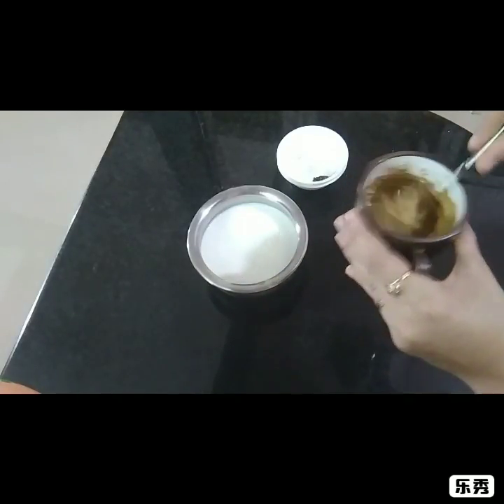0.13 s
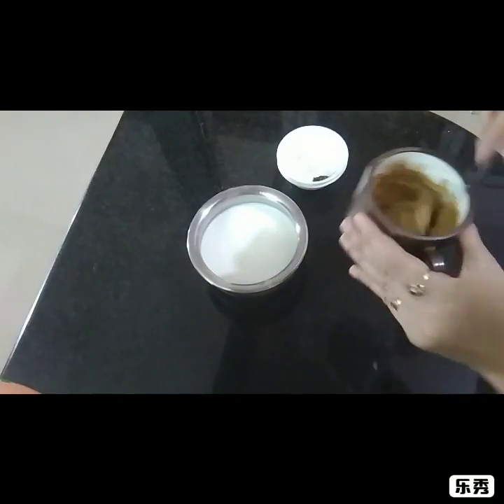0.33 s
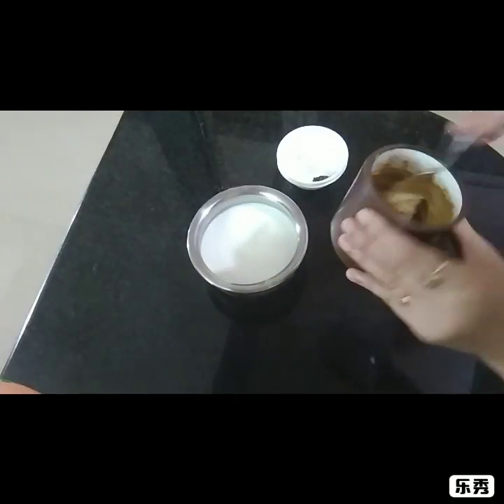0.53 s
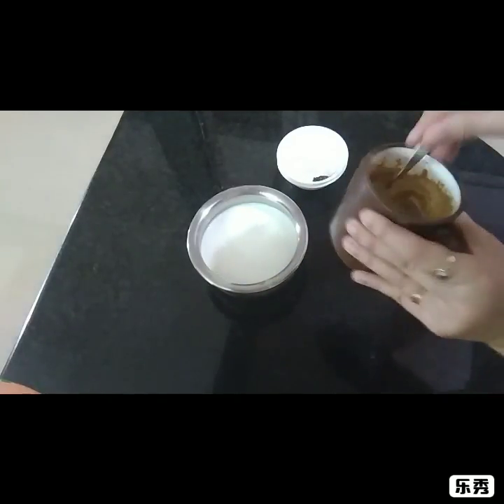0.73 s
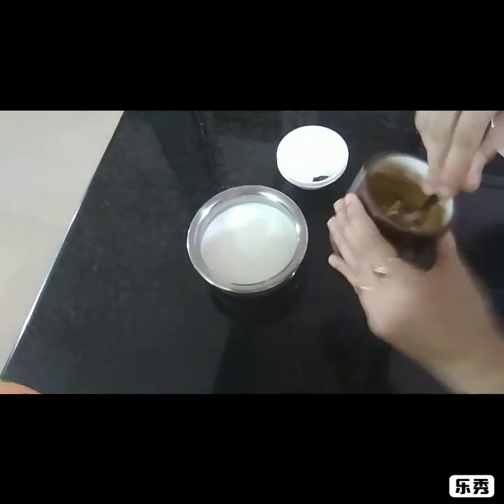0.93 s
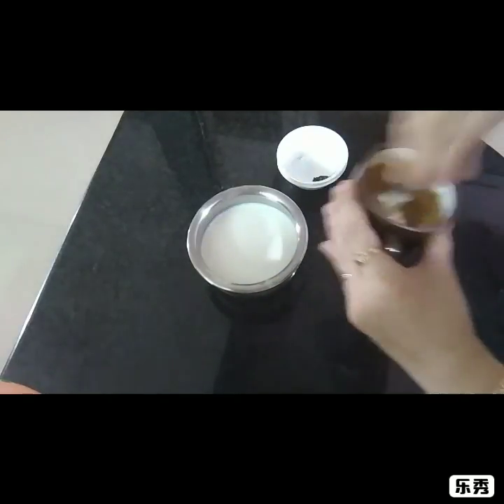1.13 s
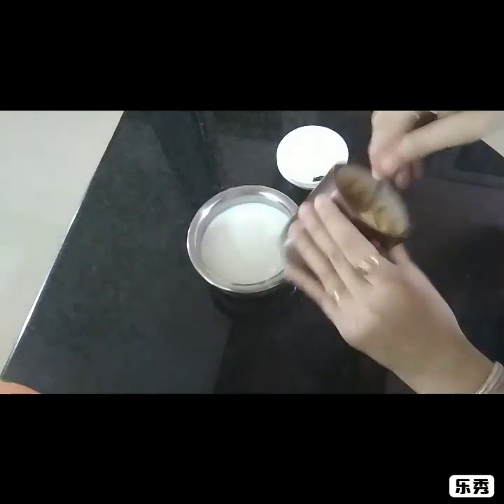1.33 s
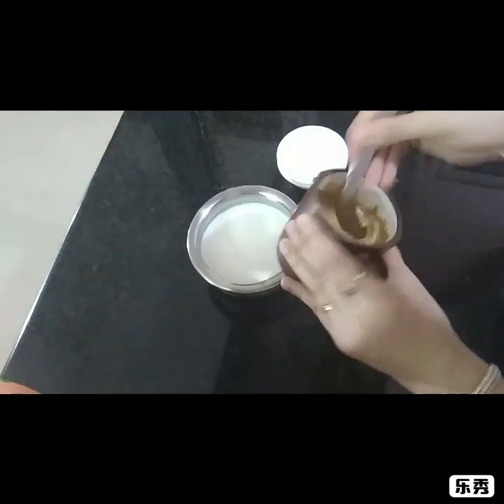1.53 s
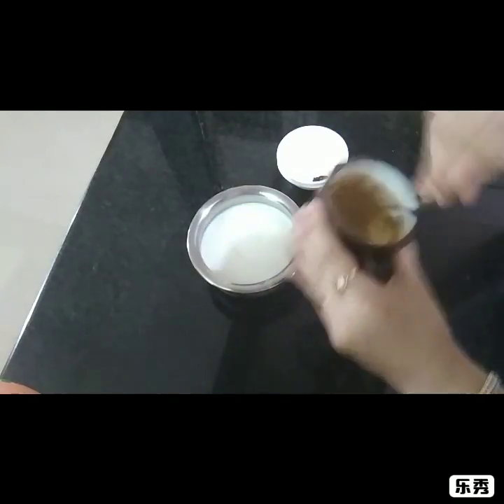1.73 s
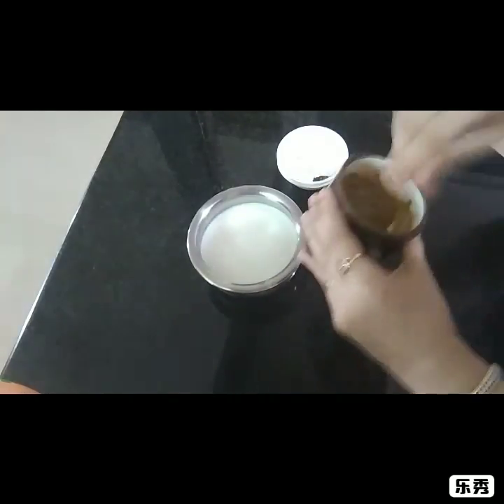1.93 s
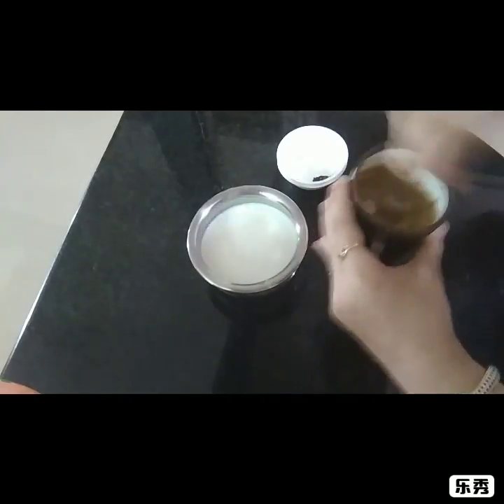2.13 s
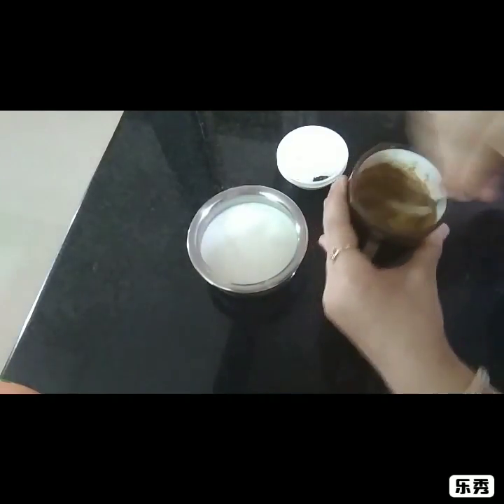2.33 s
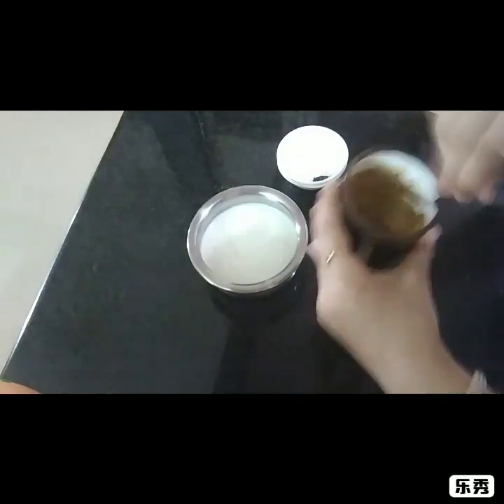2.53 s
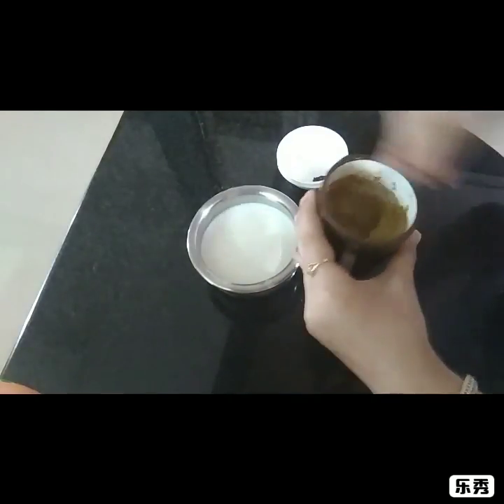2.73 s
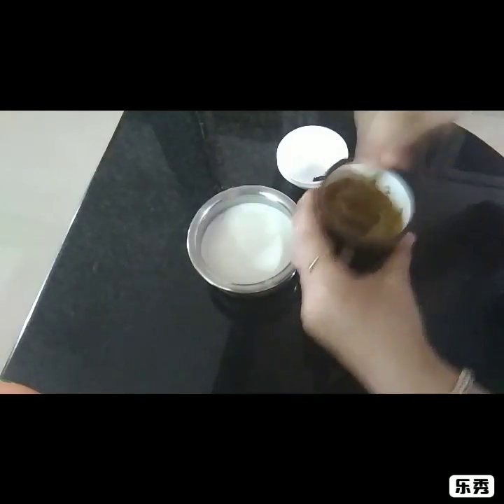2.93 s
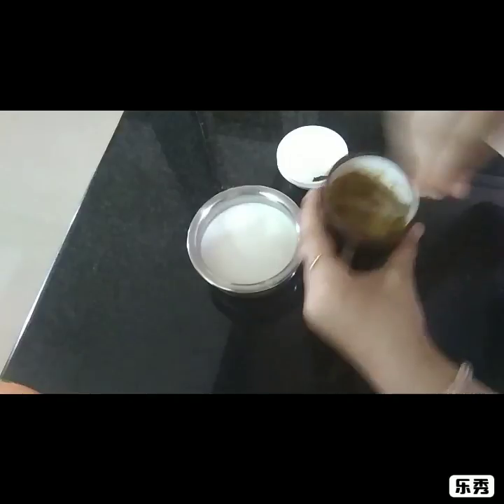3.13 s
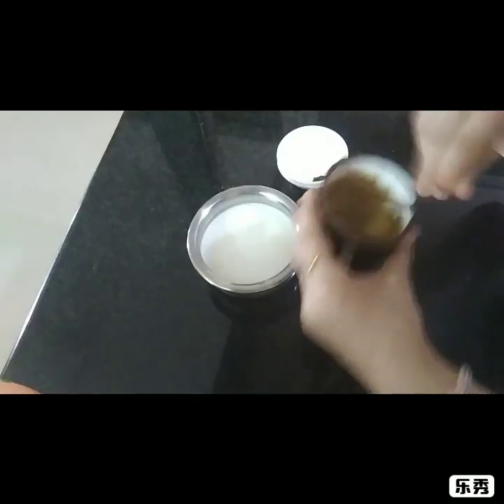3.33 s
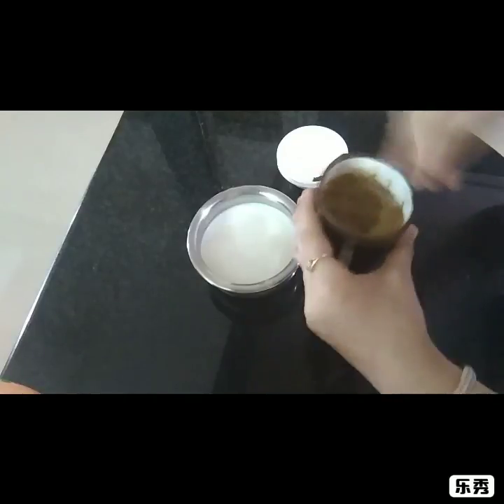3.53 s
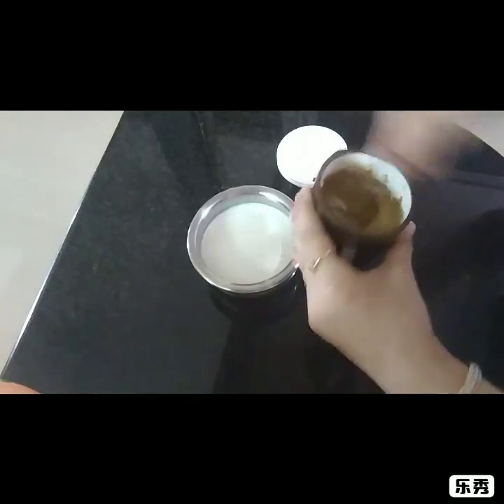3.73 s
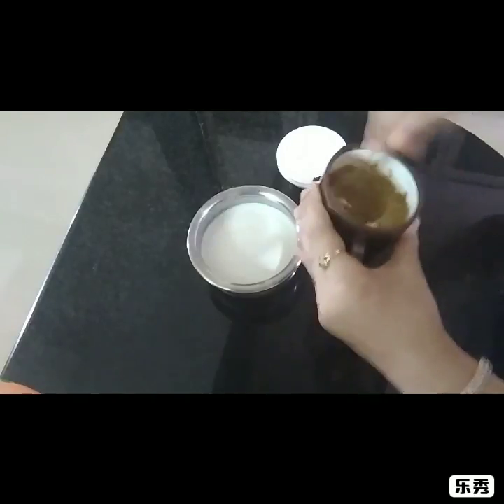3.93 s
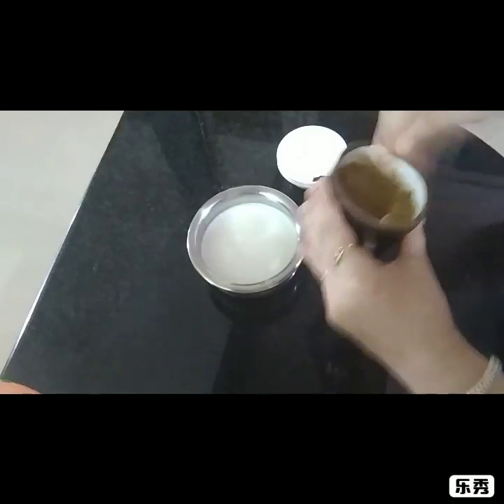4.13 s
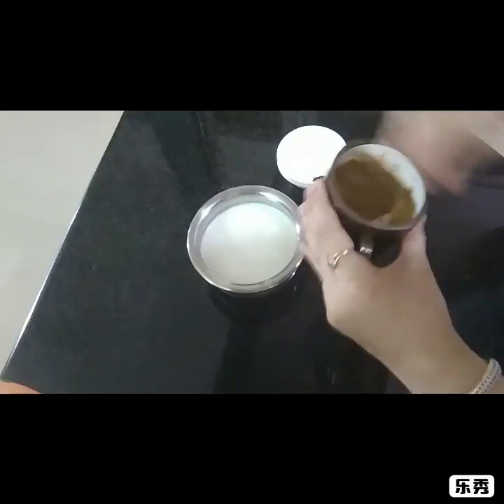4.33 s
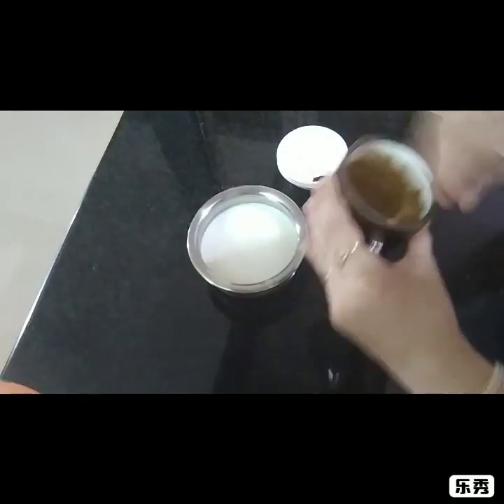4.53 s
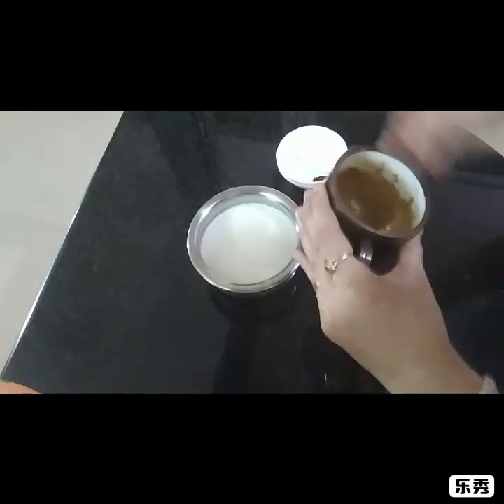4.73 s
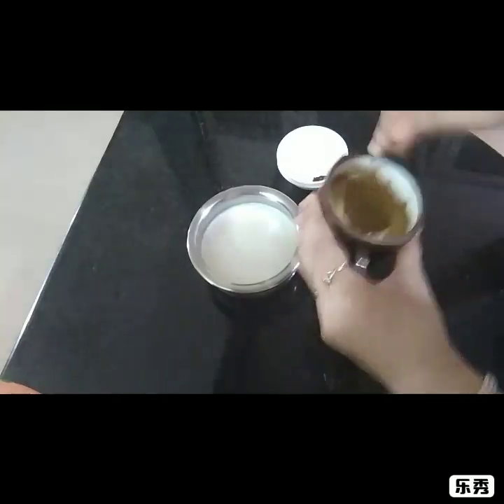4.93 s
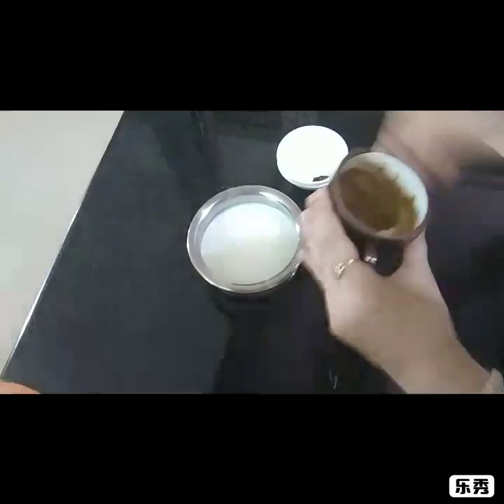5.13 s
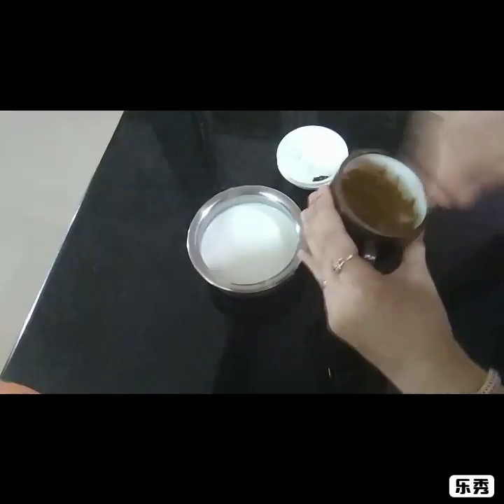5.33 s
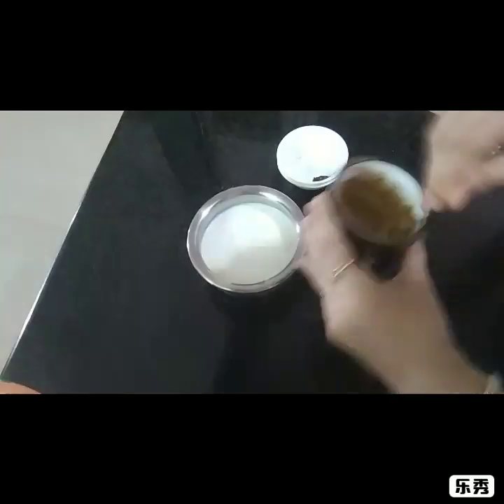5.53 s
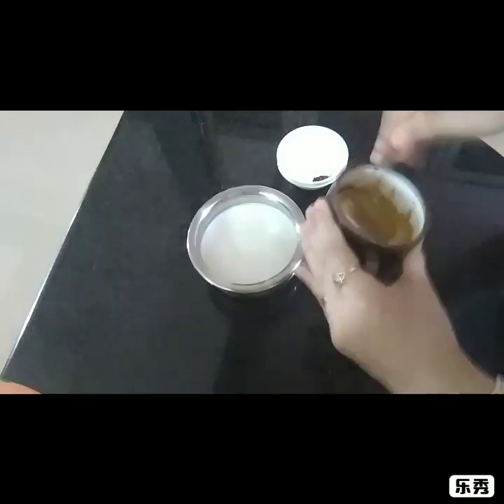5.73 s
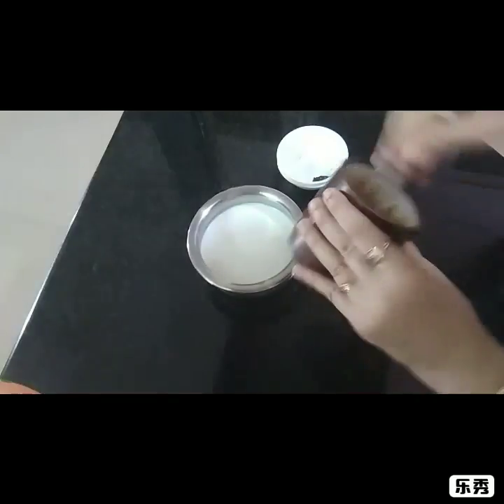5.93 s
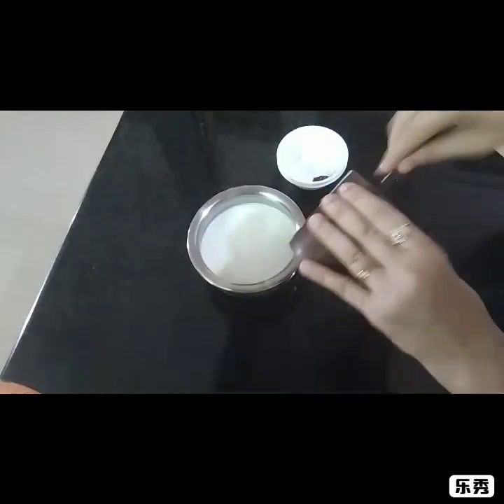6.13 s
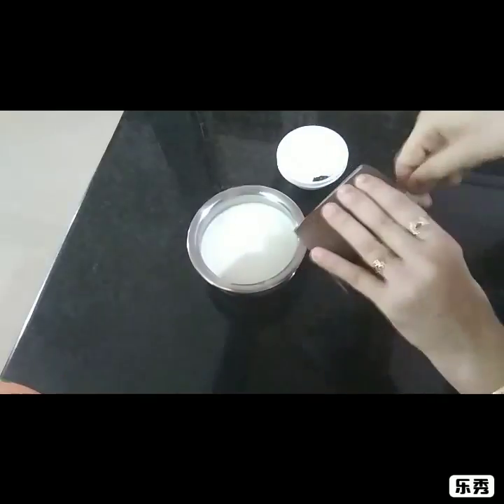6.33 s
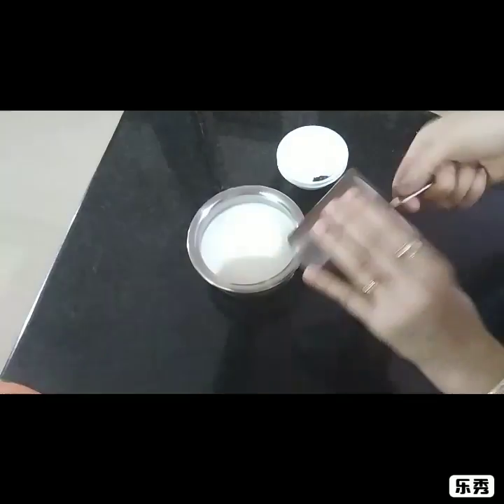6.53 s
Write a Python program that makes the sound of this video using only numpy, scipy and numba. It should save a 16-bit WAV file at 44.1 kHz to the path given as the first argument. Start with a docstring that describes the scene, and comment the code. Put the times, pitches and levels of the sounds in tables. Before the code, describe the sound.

A metal spoon whips thick sugary coffee paste in a hand-held mug, heard very near in stereo. After a soft, sparse start come bright cracks, dull short mug knocks, hollow air tones and continuous grainy rasp, roughly a dozen blows a second. One deep worktop thump interrupts early on. Tiled-room echo follows everything; finally the beating ceases and light scraping remains over a faint hush.

```python
"""Hard-walled kitchen: a steel spoon whips sugary coffee paste in a hand-held mug, then one heavy worktop thump.
Knocks: decaying sine modes of wall, air, rim and spoon plus a noise crack. Drag: grain noise through filters,
with wet slaps; the air in the mug hums along. Clunks and thuds: short narrow-band noise and sines.
An echo tail follows the mug; a faint hush lies below. Two close microphone ports."""
import sys
import numpy as np
from scipy import signal
from scipy.fft import rfft, irfft
from scipy.io import wavfile
from scipy.ndimage import uniform_filter1d
from numba import njit

SR = 44100
rng = np.random.default_rng(int(sys.argv[2]) if len(sys.argv) > 2 else 0)


def to_wav(s):
    """Save 16-bit WAV."""
    ch = np.atleast_2d(s).T  # columns
    pcm = np.round(np.clip(ch, -1, 1) * 32767)  # PCM
    wavfile.write(sys.argv[1], SR, pcm.astype(np.int16))


N = 291060

# air resonance as hand and paste cover the mug's mouth: (time [s], centre [Hz], width [Hz])
MOUTH = [(.54, 960, 50), (.62, 1086, 44.5), (.75, 1147, 44.5), (.86, 1138, 61), (.95, 1114, 110),
         (1.2, 1127, 110), (1.6, 1019, 200), (6.02, 1057, 110), (6.12, 776, 106.5), (6.35, 735, 109),
         (6.41, 770, 160), (6.48, 980, 230), (6.6, 850, 230)]
# spectrum of steel and grit on glaze, relative: (frequency [Hz], density [dB per Hz])
CRACK_SPECTRUM = [(1000, -63), (2500, -3), (7500, -4.5), (10500, 6.5), (13500, 4), (16500, -16)]
# mug wall modes: (frequency [Hz], t60 [s], relative level [dB])
WALL_MODES = [(399, 0.03, -16), (600, 0.024, -1), (778, 0.02, -1.5)]


def undb(db):
    """dB to gain."""
    return 10 ** (np.asarray(db) / 20)


def unit(x):
    """Scale to rms 1."""
    return x / np.sqrt(np.mean(x ** 2))


def along(table, hz):
    """Read a (Hz, value) table on a log-frequency axis."""
    f, v = np.transpose(table)
    return np.interp(np.log(hz + 1), np.log(f + 1), v)


def colour(x, table, share=1):
    """Filter by a (Hz, dB) table, its dB scaled by share."""
    n = x.shape[-1]
    gain = undb(share * along(table, np.fft.rfftfreq(n, 1 / SR)))
    return irfft(rfft(x) * gain, n)


def bandpass(x, low_hz, high_hz):
    """Butterworth band-pass."""
    return signal.sosfilt(signal.butter(2, [low_hz, high_hz], "band", fs=SR, output="sos"), x)


@njit
def svf(x, hz, width):
    """State-variable band-pass with a moving centre, gain 1 there."""
    y, b, l = np.empty(len(x)), 0., 0.
    for i in range(len(x)):
        g, k = np.tan(np.pi * hz[i] / SR), width[i] / hz[i]
        v = (b + g * (x[i] - l)) / (1 + g * (g + k))
        b, l, y[i] = 2 * v - b, l + 2 * g * v, k * v
    return y


def fade(t, t60):
    """Exponential decay, 60 dB in t60 (2 ms at least)."""
    return np.exp(-np.log(1000) * t / max(t60, .002))


def walk(hold):
    """Random levels held some samples and slewed; rms 1."""
    steps = np.repeat(rng.standard_normal(N // hold + 1), hold)[:N]
    return unit(uniform_filter1d(steps, size=hold))


def add(out, s, sound):
    """Mix a sound in at s seconds."""
    i = int(s * SR)
    out[..., i:i + sound.shape[-1]] += sound[..., :N - i]


def knocks():
    """Each blow builds up through the paste, rings scattered modes and cracks; rows: shared by the ports, unlike."""
    # spoon on mug: (time [s], crack, wall, air, rim level [dB])
    blows = [(0.278, -52, -52.5, -55, -67), (0.536, -52, -78, -61.5, -94), (0.836, -50, -58, -56, -78),
             (1.2149, -30, -30, -49, -80), (1.261, -22, -27.5, -51, -57), (1.2963, -11, -34, -57, -33.5),
             (1.435, -21.5, -69, -65, -58), (1.4567, -20, -44, -38.5, -65), (1.5934, -15.5, -37, -35, -40),
             (1.6473, -49, -24.5, -48, -61), (1.685, -52, -31.5, -59, -62), (1.781, -34, -30, -36, -39.5),
             (1.8558, -28, -32.5, -35.5, -49.5), (1.9355, -13, -25.5, -29.5, -39.5),
             (1.944, -28, -32.5, -32, -48), (2.003, -16, -28, -74, -34), (2.0623, -3, -24.5, -23.5, -37),
             (2.171, -22, -25.5, -30.5, -57), (2.4228, -14, -20.5, -24.5, -26),
             (2.4651, -8, -25.5, -24, -30.5), (2.5669, -10, -44, -27.5, -57), (2.573, -24, -40, -34.5, -42),
             (2.6175, -8.5, -19, -25.5, -20), (2.693, -20, -20, -34, -51), (2.6993, -14, -22, -26.5, -37),
             (2.742, -17.5, -29, -42, -44), (2.8565, -11, -32, -48, -31.5), (2.868, -16, -31, -49, -27),
             (2.9028, -20, -35, -31, -31), (2.9448, -30, -22.5, -19.5, -40), (2.9806, -9, -28, -47, -28),
             (3.104, -12, -31.5, -33.5, -34.5), (3.1649, -27, -35.5, -38, -30),
             (3.197, -14, -26.5, -43, -41), (3.229, -16.5, -24.5, -29, -40),
             (3.244, -14.5, -20.5, -17, -23.5), (3.324, -17.5, -26.5, -32.5, -35.5),
             (3.359, -12, -26, -26.5, -34), (3.3737, -5.5, -25.5, -30, -22.5),
             (3.454, -12.5, -22.5, -24, -27), (3.502, -12, -24, -27, -34.5), (3.5816, -37, -29, -33, -42),
             (3.6061, -11.5, -19, -20.5, -28.5), (3.708, -31, -36, -33.5, -60),
             (3.7441, -15.5, -27, -37, -41.5), (3.829, -15.5, -32, -37, -39),
             (3.8526, -20, -27, -24.5, -30.5), (3.9036, -19.5, -42, -24.5, -30.5),
             (3.9423, -17.5, -21.5, -23, -43), (3.9954, -26, -24, -33.5, -40),
             (4.0684, -12.5, -22.5, -35, -49), (4.1104, -11.5, -15, -20.5, -19.5),
             (4.2426, -22.5, -51, -40.5, -41), (4.326, -25, -28, -35.5, -36.5),
             (4.3948, -19, -36, -30.5, -40.5), (4.44, -7.5, -21.5, -14.5, -30),
             (4.5544, -7, -25.5, -23.5, -35), (4.606, -11.5, -26, -41, -33), (4.612, -19, -25, -32, -23.5),
             (4.665, -10, -15, -16.5, -29), (4.7475, -23, -31.5, -58, -55), (4.837, -29, -32, -30, -40.5),
             (4.8482, -27, -25, -41.5, -29.5), (4.939, -13.5, -21, -17.5, -38), (5.064, -45, -35, -36, -67),
             (5.115, -17, -19, -28, -19.5), (5.193, -15, -24, -33, -29.5), (5.2312, -12, -22.5, -26, -32),
             (5.29, -18, -32, -52, -40), (5.345, -14.5, -35, -35.5, -39), (5.449, -19, -26.5, -30.5, -37.5),
             (5.5124, -13.5, -23.5, -29.5, -27), (5.5711, -9, -31.5, -36.5, -36),
             (5.602, -9.5, -25, -28.5, -24.5), (5.699, -10.5, -25, -25.5, -33.5),
             (5.8448, -15.5, -38, -40, -51), (5.8805, -22, -31.5, -35, -29.5),
             (5.9805, -16, -45, -37, -40.5), (6.0827, -26, -71, -57, -55), (6.1404, -66, -73, -44.5, -77),
             (6.288, -53, -67, -45.5, -58), (6.3872, -23.5, -43, -46.5, -57)]
    # modes of the air in the mug, moved in proportion to MOUTH: (frequency [Hz], t60 [s], relative level [dB])
    air_modes = [(1062, 0.036, 3), (1323, 0.015, -1)]
    # rim modes: (frequency [Hz], t60 [s], relative level [dB])
    rim_modes = [(1720, 0.03, -19.5), (2628, 0.013, 0), (3270, 0.0026, -5)]
    # spoon mode: (frequency [Hz], t60 [s], relative level [dB])
    spoon_modes = [(5156, 0.03, -5)]
    crest_db = 11  # crack level over its noise rms
    rise_median_ms, rise_spread = 3.1, .35  # until the paste gives way; hard blows shorten it
    mode_spread_db, tilt_spread = 3.5, .25  # blow-to-blow scatter of modes and of crack colour
    tick_t60_s = .014
    bounce_count, bounce_scale_ms, bounce_db = 3, 8, -10

    out, t = np.zeros((2, N)), np.arange(4096) / SR
    groups = [WALL_MODES, air_modes, rim_modes, spoon_modes]
    hz, t60, db = np.transpose(sum(groups, []))[:, :, None]
    air = slice(len(WALL_MODES), len(WALL_MODES) + len(air_modes))
    for s, crack_peak_db, wall_db, air_db, rim_db in blows:
        crack_db = crack_peak_db - crest_db
        spoon_db = (crack_db + rim_db) / 2 - 6.5
        rise = rise_median_ms * np.exp(rise_spread * rng.standard_normal()) * 1e-3
        # a hard blow cuts through sooner
        rise *= np.clip(undb(-20 - max(wall_db, air_db)) / 2, .25, 1)
        build, after = np.minimum(t / rise, 1) ** 2, np.maximum(t - rise, 0)

        group_db = [wall_db, air_db, rim_db, spoon_db]
        blow_db = np.repeat(group_db, [len(g) for g in groups])[:, None]
        # the mouth sets the pitch of the air
        mouth_hz = np.interp(s, *np.transpose(MOUTH)[:2])
        hz[air] = np.array(air_modes)[:, :1] * mouth_hz / air_modes[0][0]
        # landing spot scatters mode levels, clinging paste detunes: (row, level / detune / phase, mode, 1)
        chance = rng.standard_normal((2, 3, len(hz), 1))
        chance[0, 1, air.stop:] *= .5  # rim and spoon stand clear of the paste
        chance[0, :2, air] *= 0.4  # the air is less in its reach
        tone = np.sin(2 * np.pi * hz * (1 + 0.045 * chance[0, 1]) * t + 1.54 * chance[:, 2])
        mode_gain = undb(blow_db + db + mode_spread_db * chance[:, 0])
        modes = mode_gain * np.exp(-np.log(1000) * after / t60) * tone

        noise = rng.standard_normal((4, 2, len(t)))
        tilt = 1 + tilt_spread * rng.standard_normal()
        crack = undb(crack_db) * unit(colour(noise[0], CRACK_SPECTRUM, tilt))
        crack += undb(rim_db - 2.5) * unit(bandpass(noise[1], 840, 3500))
        crack += undb(spoon_db) * unit(bandpass(noise[2], 4750, 6600))
        # sharp tick, then grit shaken loose; sliding steel chatters
        burst = fade(after, tick_t60_s) + undb(-9.0) * fade(after, 0.22)
        chatter = undb(1.64 * unit(uniform_filter1d(noise[3, 0], size=90)))
        # wet paste keeps touching the wall, so the ring wobbles
        smear = undb(3 * unit(uniform_filter1d(noise[3, 1], size=160)))
        blow = build ** .5 * smear * modes.sum(axis=1) + build * chatter * burst * crack
        add(out, s - rise / 2, blow)
        # the spoon touches again, weaker
        for wait, size in rng.exponential(size=(bounce_count, 2)):
            bounce_gain = undb(bounce_db - 4 * size - 4 * wait)
            add(out, s + (.2 + wait) * bounce_scale_ms / 1000, bounce_gain * blow)
    return out


def drag():
    """Sugar grains crunch under the spoon; the same rubbing drives the rim, the air in the mug and the wall."""
    # steady pressure of spoon on paste: (time [s], grit level [dB], air hum level [dB])
    pressure = [(0, -79.5, -76), (.3, -88, -94), (0.521, -77, -94), (0.549, -77, -71), (0.679, -58, -53),
                (0.781, -57, -45.5), (1.06, -51, -54.5), (1.19, -67, -59), (1.36, -46.5, -56),
                (1.6, -49, -43.5), (1.9, -56.5, -87), (2.2, -39.5, -64), (3.099, -48, -48),
                (4.6, -46, -52.5), (5.6, -48.5, -46.5), (5.93, -48, -73), (6.06, -53.5, -63),
                (6.13, -59, -77), (6.15, -59, -60), (6.25, -62, -67), (6.37, -61, -74), (6.45, -47, -52),
                (6.6, -55, -57.5)]
    # sweeps along the wall and lulls: (time of greatest change [s], grit relative to steady level,
    # negative for a lull [dB])
    sweeps = [(0.099, 19.5), (0.954, 11), (1.45, 2), (2.4, -0.5), (2.68, -8.5), (2.92, -1), (3.19, 8),
              (3.31, 5.5), (3.69, 5.5), (3.92, 8.5), (4.52, 7.5), (5.15, 10.5), (5.38, 12), (5.801, 6),
              (6.309, 12)]
    # unevenness of each part: [grit, rasp, hum, wall] [dB]
    slip_spread_db = (3, 2.5, 2, 4)
    sweep_in_s, sweep_out_s = 0.073, 0.12
    firm_db = -46  # grit level at firm pressure
    rasp_db, rasp_slope = -50, 1.68  # level at firm pressure; dB lost per dB below it
    wall_db, wall_slope = -57.5, 5.5
    hum_slope = 0.052  # dB per dB of sweep
    lump_share = 1.1
    wander = .045  # relative rms of the air pitch wander at firm pressure

    t = np.arange(N) / SR
    s, steady_db, hum_db = np.transpose(pressure)
    sweep_db = sum(db * np.interp(t - at, [-sweep_in_s, 0, sweep_out_s], [0, 1, 0]) for at, db in sweeps)
    grit_db = np.interp(t, s, steady_db) + sweep_db
    # a light touch only rolls the grains; rim and wall speak once the spoon bears down
    light, firm = np.minimum(grit_db - firm_db, 0), np.maximum(grit_db - firm_db, 0)
    rasp_level_db = rasp_db + rasp_slope * light + firm
    hum_level_db = np.interp(t, s, hum_db) + hum_slope * sweep_db
    wall_level_db = wall_db + wall_slope * light + firm

    grain_gain = undb(np.minimum(3 * rng.exponential(size=N), 20))
    grains = unit(rng.standard_normal((2, N)) * grain_gain)
    grit = colour(grains, CRACK_SPECTRUM)
    # the rasp is seven noise bands whose levels wander separately; the lowest need a firm push
    rasp = 0
    for hz in 1900 * 1.27 ** np.arange(7):
        band_gain = undb(5 * walk(1600)) * undb(light * (1900 / hz) ** 2)
        rasp = rasp + band_gain * bandpass(grains, hz / 1.13, hz * 1.13)
    # spoon and paste keep changing the air space
    at, centre_hz, width_hz = np.transpose(MOUTH)
    mouth, width = np.interp(t, at, centre_hz), np.interp(t, at, width_hz)
    mouth = mouth * (1 + wander * walk(2500) * undb(2 * light))
    hum = np.array([svf(svf(svf(g, mouth, width), mouth, 2 * width), mouth, 2 * width) for g in grains])
    wall = sum(undb(db) * bandpass(grains, hz - 70, hz + 70) for hz, _, db in WALL_MODES)

    out = slaps(rasp_level_db)
    levels_db = (grit_db, rasp_level_db, hum_level_db, wall_level_db)
    for part, db, slip_db in zip((grit, rasp, hum, wall), levels_db, slip_spread_db):
        slips = walk(300)  # uneven slipping, felt separately by each part
        lumps = walk(1500)  # thick and thin paste
        out = out + undb(db + slip_db * (slips + lump_share * lumps)) * unit(part)
    return out


def slaps(level_db):
    """Wet paste smacks the wall: decaying sines of random pitch, a few cycles each, following level_db."""
    slaps_per_s, slap_db = 90, 11  # slap_db over level_db, before random size
    out, t = np.zeros((2, N)), np.arange(768) / SR
    for at, pitch, size, turn in rng.random((int(slaps_per_s * N / SR), 4)):
        hz = 450 * 7 ** pitch
        tone = np.sin(2 * np.pi * (hz * t + np.array([[0], [turn]])))
        tone = tone * np.minimum(t * hz, 1) * fade(t, 9 / hz + .003)
        gain = undb(level_db[int(at * N)] + slap_db + 4 * np.log(size + .01))
        add(out, at * N / SR, gain * tone)
    return out


def clunks():
    """The laden spoon settles in the mug: sticky contact, rough rubbing in two narrow rings."""
    # (time [s], level [dB], rise [s], t60 [s], lower ring [Hz], upper ring [Hz])
    settlings = [(0.057, -60.5, 0.014, 0.19, 492, 1370), (0.277, -52, 0.0018, 0.11, 1070, 1810)]
    out, t = np.zeros((2, N)), np.arange(16384) / SR
    for s, db, rise, t60, *rings_hz in settlings:
        ring = sum(unit(bandpass(rng.standard_normal((2, len(t))), .93 * hz, 1.07 * hz)) for hz in rings_hz)
        envelope = np.minimum(t / rise, 1) * fade(np.maximum(t - rise, 0), t60)
        add(out, s, undb(db) * ring * envelope)
    return out


def thuds():
    """Blows go through the mug into the hand: dull, slightly rough pushes a few cycles long."""
    # (time [s], level [dB], frequency [Hz])
    pushes = [(1.261, -48, 121), (1.941, -37, 160), (1.997, -25.5, 270), (2.067, -57, 90),
              (2.131, -43, 120), (2.43, -36, 80), (2.698, -43, 90), (2.979, -51, 80), (3.374, -47, 101),
              (3.454, -51, 70), (3.605, -48, 91), (4.07, -50, 80), (4.111, -40, 160), (4.44, -55, 100),
              (4.555, -51, 90), (4.617, -40, 202), (4.665, -37, 110), (4.752, -37, 200), (4.821, -60, 131),
              (4.94, -47, 150), (5.115, -47, 149), (5.235, -44, 81), (5.698, -49, 100)]
    t60_cycles = 6
    out, t = np.zeros((2, N)), np.arange(8192) / SR
    for s, db, hz in pushes:
        rough = unit(bandpass(rng.standard_normal((2, len(t))), hz / 2, hz * 2))
        push = np.sin(2 * np.pi * hz * t) + 0.45 * rough
        envelope = np.minimum(t * hz, 1) * fade(t, t60_cycles / hz)
        add(out, s, bandpass(undb(db) * push * envelope, hz / 3, hz * 4))
    return out


def thump():
    """A heavy blow on the worktop: dense ringing whose bass swells late and whose treble dies first."""
    # relative noise spectrum: (frequency [Hz], density [dB per Hz])
    spectrum = [(35, -70), (60, -46), (110, -7.5), (268, 1), (540, -1), (1110, -9), (1800, -5.5),
                (2710, -10), (5860, -18), (11500, -17), (16000, -20)]
    # worktop modes: (frequency [Hz], level [dB])
    worktop_modes = [(254, -23), (290, -21), (1705, -27)]
    start_s, noise_db, t60_s = 2.2165, -9.5, 0.47
    out, t = np.zeros((2, N)), np.arange(32768) / SR
    noise = unit(colour(rng.standard_normal((2, len(t))), spectrum))
    low, middle = bandpass(noise, 30, 500), bandpass(noise, 500, 3500)
    treble = noise - low - middle
    sound = low * np.minimum(t / 0.0056, 1) * fade(t, t60_s)
    sound += (middle * fade(t, t60_s) + treble * fade(t, 0.55 * t60_s)) * np.minimum(t / 0.0015, 1)
    sound *= undb(noise_db)
    hz, db = np.transpose(worktop_modes)[:, :, None]
    modes = undb(db) * np.sin(2 * np.pi * (hz * t + rng.random((len(hz), 1))))
    sound[0] += modes.sum(axis=0) * np.minimum(t / 0.011, 1) * fade(t, t60_s)
    add(out, start_s, sound)
    return out


def kitchen(dry):
    """Tiles and worktop: a dense tail, each octave with its own decay; each place of the mug has its own tail."""
    # (frequency [Hz], t60 [s])
    octave_t60 = [(300, 0.44), (1000, 0.42), (2500, 0.4), (12000, 0.2)]
    echo_db, moves_per_s, places = -8.5, 5, 4
    t, tail = np.arange(24576) / SR, 0
    for hz in 125 * 2. ** np.arange(8):
        noise = rng.standard_normal((places, 2, len(t)))
        octave = bandpass(noise, hz / 2 ** .5, min(hz * 2 ** .5, .49 * SR))
        tail = tail + octave * fade(t, along(octave_t60, hz))
    tail = tail * np.clip(t / 0.01, 0, 1)
    tail = tail / np.sqrt(np.sum(tail ** 2) / 2 / places)
    # the mug never holds still, so the mix of tails keeps changing
    hold = int(SR / moves_per_s)
    steps = np.repeat(rng.standard_normal((places, N // hold + 1)), hold, axis=1)[:, :N]
    near = uniform_filter1d(steps, hold)
    near = near / np.sqrt(np.sum(near ** 2, axis=0))
    echoes = signal.oaconvolve((near * dry[0])[:, None], tail, axes=2)[..., :N]
    return undb(echo_db) * echoes.sum(axis=0)


def hush():
    """Faint steady noise, coloured by a fixed spectrum."""
    # relative spectrum: (frequency [Hz], density [dB per Hz])
    spectrum = [(24, -99), (40, -38), (96, -16), (320, -8), (491, -16.5), (1100, -25), (2200, -31),
                (13100, -45), (16000, -49)]
    return undb(-74.5) * unit(colour(rng.standard_normal((2, N)), spectrum))


def scene():
    """Mug, room, thump and hush, as two close microphone ports hear them."""
    # unlike part of the ports against the shared part: (frequency [Hz], gain [dB])
    unlike_gain = [(60, -11), (150, -14), (350, -10), (700, -5), (1400, -1), (8000, 0)]
    # left port over right: (frequency [Hz], gain [dB])
    left_over_right = [(100, -1.8), (400, 3), (1200, -1), (3000, 1), (8000, 5.5), (13000, 3)]
    # a small mug sends out little bass
    mug_highpass = signal.butter(2, 268, "high", fs=SR, output="sos")
    mug = signal.sosfilt(mug_highpass, knocks() + clunks() + drag())
    shared, unlike = mug + kitchen(mug) + thuds() + thump() + hush()
    unlike = colour(unlike, unlike_gain)
    left = colour(shared + unlike, left_over_right, .5)
    right = colour(shared - unlike, left_over_right, -.5)
    return np.array([left, right])


def record(dry):
    """Soft saturation rounds the loudest peaks; a steep low-pass cuts the top."""
    top_hz, ceiling = 16000, .8
    rounded = ceiling * np.tanh(dry / ceiling)
    return signal.sosfilt(signal.ellip(8, .2, 70, top_hz, fs=SR, output="sos"), rounded)


dry = scene()
out = record(dry)
to_wav(out)
```